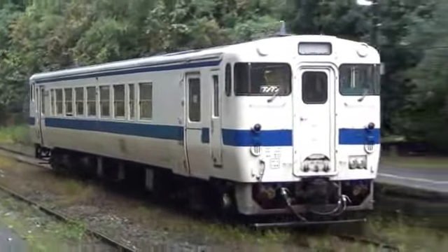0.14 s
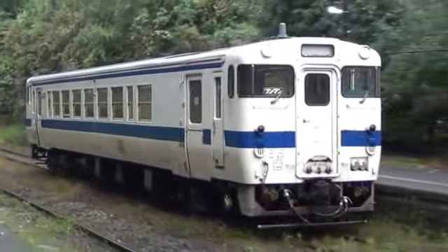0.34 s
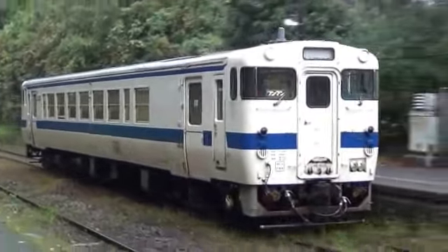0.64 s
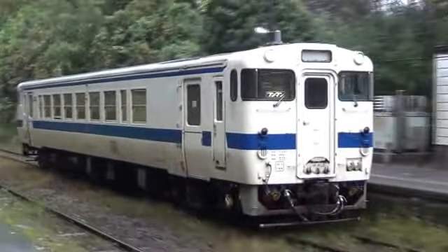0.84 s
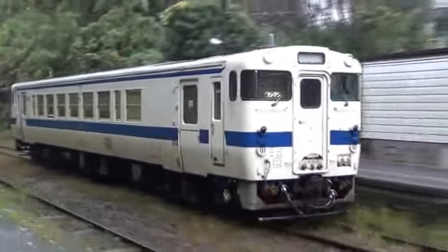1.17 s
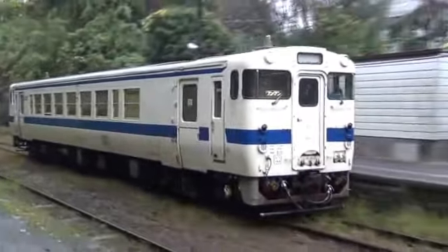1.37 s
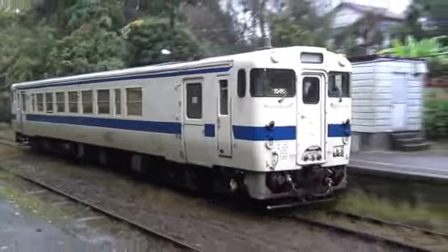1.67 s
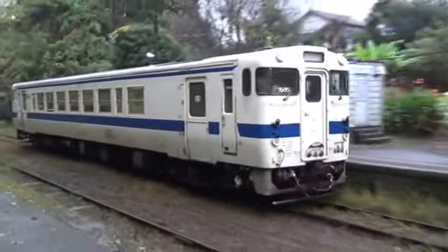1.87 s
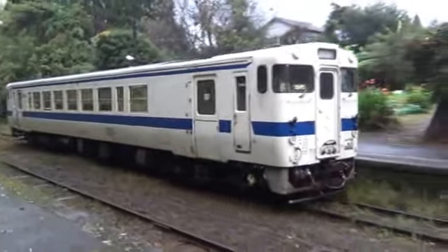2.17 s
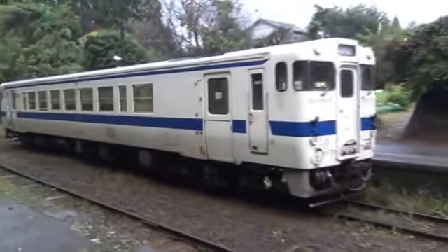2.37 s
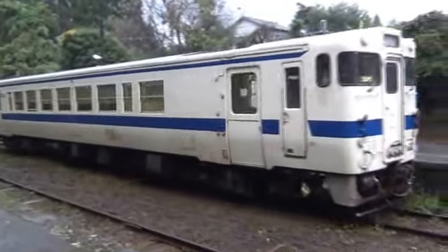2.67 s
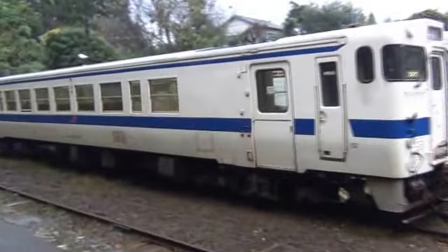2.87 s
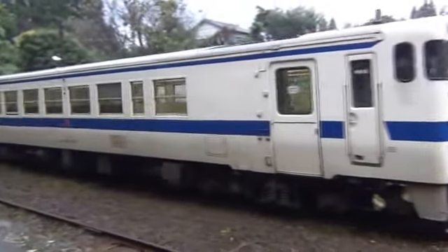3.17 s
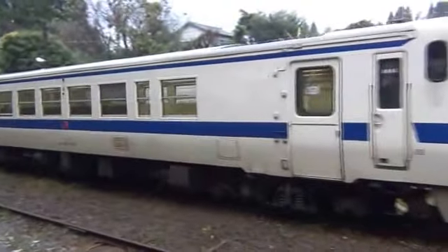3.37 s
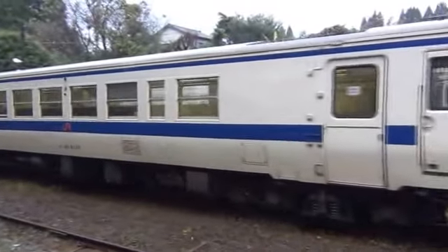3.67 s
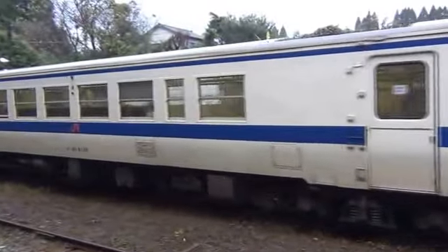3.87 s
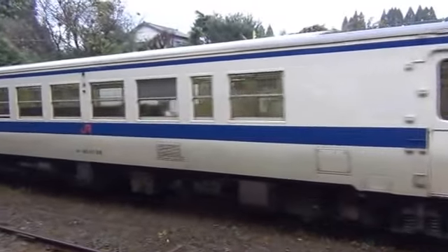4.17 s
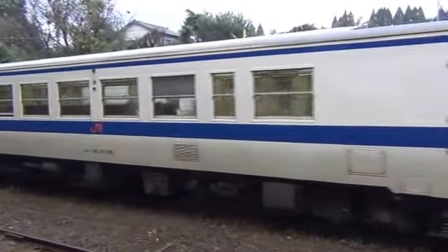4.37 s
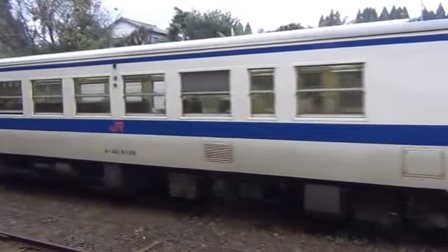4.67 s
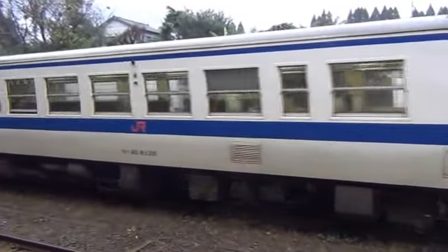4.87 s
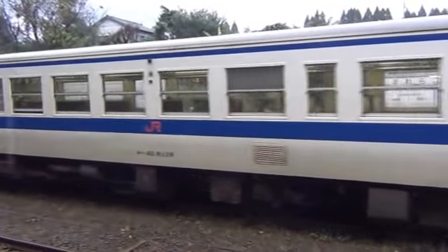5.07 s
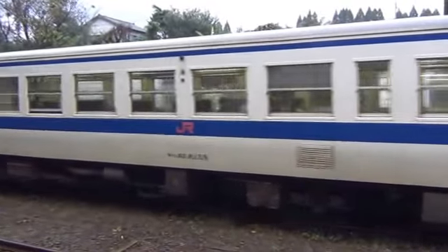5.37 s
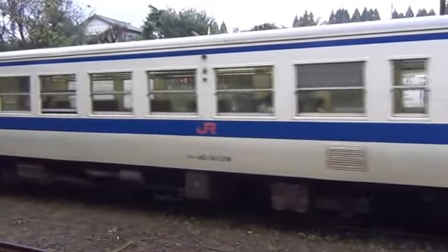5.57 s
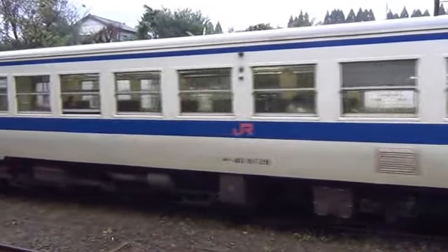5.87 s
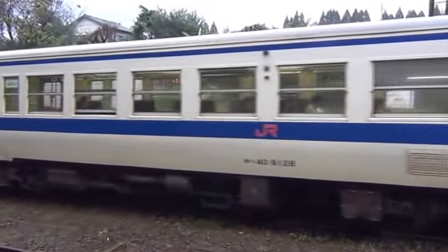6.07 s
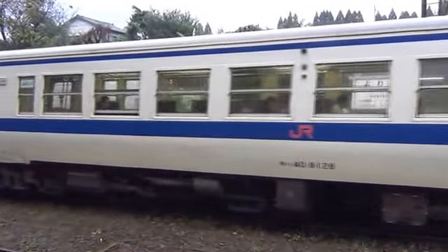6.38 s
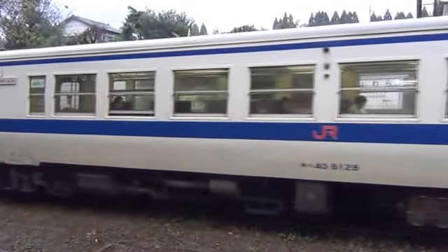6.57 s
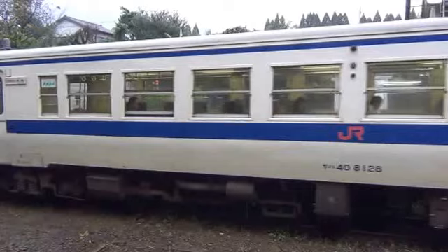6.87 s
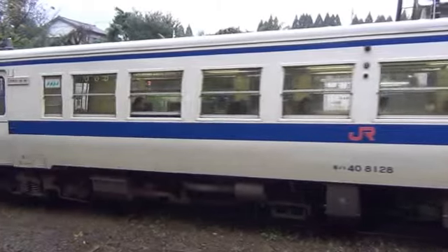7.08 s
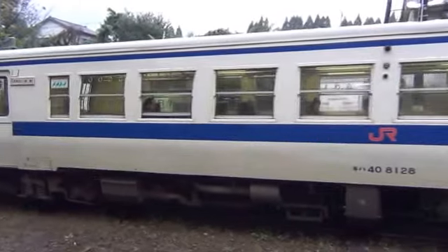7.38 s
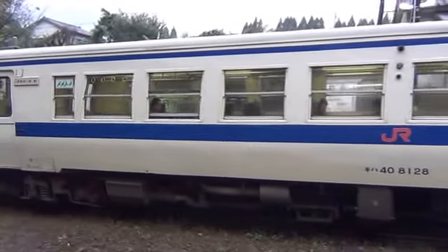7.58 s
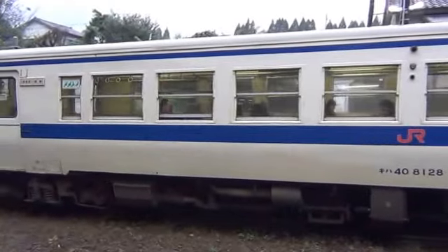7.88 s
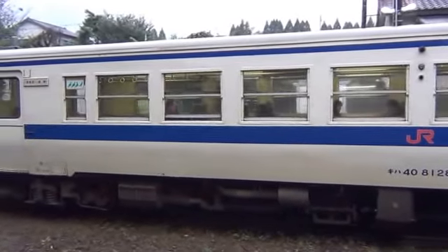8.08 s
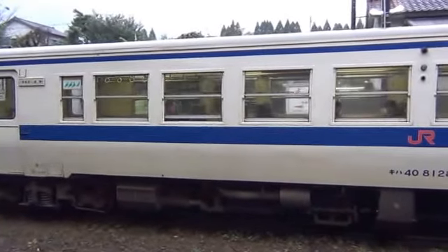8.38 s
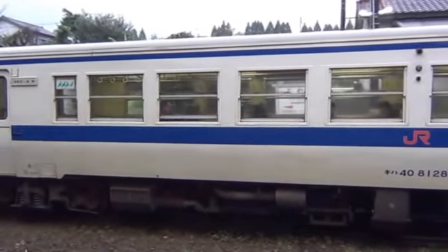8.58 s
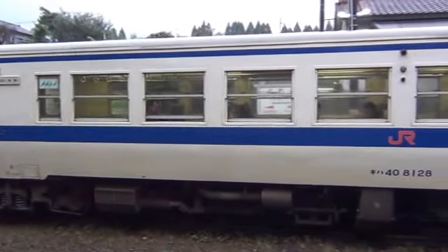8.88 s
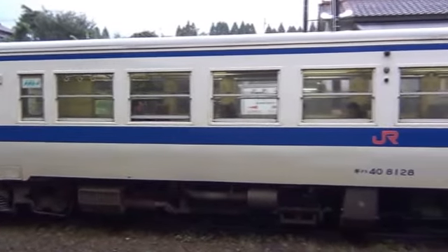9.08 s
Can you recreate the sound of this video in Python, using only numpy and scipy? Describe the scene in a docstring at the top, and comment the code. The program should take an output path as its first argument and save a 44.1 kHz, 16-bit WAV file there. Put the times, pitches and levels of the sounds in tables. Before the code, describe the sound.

A railcar slows almost to a stop very near the listener at an open-air platform. Rough steel-on-steel rolling and joint blows come first, coloured by a humming rail and sudden piercing shrieks. Then the roar drops away, and bright brake hiss with clustered, glassy squeals spreads between left and right. Finally the squeals thin to brief chirps over a soft, quick diesel knocking that grows slightly.

```python
"""Railcar braking beside the track

A diesel railcar slows almost to a stop beside a microphone pair, its engine knocking under the floor.
The engine is noise shaped by each firing, with low orders as tones; the wheels are roar and rumble noise,
with blows at the rail joints and a humming rail. The brake blocks scrape as bright noise and squeal as
narrow modes, each a tone pushed about by chance; the brakes spread and shift between left and right.
"""
import sys
import numpy as np
from scipy import signal
from scipy.io import wavfile
from scipy.ndimage import uniform_filter1d

SR = 44100
rng = np.random.default_rng(int(sys.argv[2]) if len(sys.argv) > 2 else 0)


def materialize(psi):
    """Save the field psi as 16-bit PCM at rate SR to the path in sys.argv[1].

    A 1-D psi becomes a single channel; in a 2-D psi each row is a channel.
    """
    bounded = np.clip(np.atleast_2d(psi).T, -1, 1)
    quanta = np.round(bounded * 32767).astype(np.int16)
    wavfile.write(sys.argv[1], SR, quanta)


N = 407043
T = np.arange(N) / SR

# Train speed; faster rubbing widens every squeal. Each row: time in seconds, share of the entry speed.
SPEED = [(0, 1.0), (3, 0.88), (5, 0.7), (6.5, 0.57), (7.2, .3), (8.5, 0.14), (9.23, 0.12)]

# How the microphone pair hears the wheels and the engine. Each row: frequency in Hz, likeness of the
# channels (0 to 1), left minus right in dB, left lead in radians.
WHEELS_PAIR = [(70, 0.95, 1, .25), (150, 0.93, 3.5, 0.036), (300, 1, 2, 0.36), (550, 0.98, 2, 0.68),
               (990, 0.79, 2.5, 0.037), (2500, .87, 1, 0.058), (9000, 1, 1, 0)]
ENGINE_PAIR = [(70, .99, 0, 0), (300, 1, 0, 0), (550, 0.98, 0.21, .1), (1000, 0.92, 1.2, .1),
               (2500, 0.98, 0.12, .05), (9000, 0.98, 0, 0)]
# The brakes across the pair as the car draws alongside. Each row: time in seconds, likeness of the
# channels (0 to 1), left minus right in dB, left lead in radians.
BRAKES_PAIR = [(0, 0.85, -1.5, 0), (1.3, 1, -0.5, 0), (2.5, 0.82, 0.7, 0.29), (4.5, 0.62, 1.8, 0.31),
               (6.3, 0.89, 1.2, 0.009), (8, 0.81, 1, 0.27), (9.23, 0.83, -0.5, 0.047)]
CUT_HZ, EDGE_HZ = 64, 15500  # bass roll-off of the microphone, upper band limit

# Engine loudness, before the balance of its parts. Each row: time in seconds, level in dB.
ENGINE_LEVEL = [(3.2, -23), (3.35, -36), (3.7, -39.5), (4.29, -42.5), (4.58, -38.5), (5.3, -38.5),
                (5.55, -41.5), (6.0, -44.5), (6.3, -42), (6.63, -46.5), (6.96, -47), (7.3, -43),
                (7.68, -43), (7.97, -44.5), (8.29, -40.5), (9.23, -38.5)]
# Colour of the engine block and exhaust. Each row: frequency in Hz, relative level in dB per Hz.
BLOCK_COLOUR = [(24, -58), (40, -53), (71, -42), (126, -54), (158, -26), (333, -11), (407, -39),
                (449, -14.5), (722, -9), (797, -2.5), (859, -8.5), (3560, -19.5), (4570, -26.5),
                (13300, -21), (15500, -41)]
# A broad ring of the engine casing. One row: frequency in Hz, width in Hz, lift in dB.
CASING = (1011, 48, 12)
# Humming orders of the engine. Each row: multiple of the firing rate, level in dB.
ENGINE_ORDERS = [(2, -24), (3, -31.5), (5, -25), (6, -30.5), (10, -15.5), (13, -17), (15, -18.5),
                 (24, -4.5), (29, -20)]
# Middle orders grow as the exhaust draws level. Each row: time in seconds, change in dB.
EXHAUST_NEAR = [(3.2, -5), (6, -3.5), (7.1, -1.5), (9.23, 3)]
FIRING_HZ, FIRING_AT = 34.05, 8.686  # mean firing rate, about the moment of one firing (s)

# Rolling loudness, before the roar's lift of 1.5 dB. Each row: time in seconds, level in dB.
ROLLING_LEVEL = [(0.0, -27.5), (0.15, -25.5), (0.43, -26), (0.8, -23.5), (1.3, -23), (1.71, -21),
                 (1.9, -22.5), (2.13, -20), (2.3, -24), (2.77, -26), (2.84, -22), (3.0, -21.5),
                 (3.16, -27.5), (3.29, -28), (3.47, -29), (3.55, -34.5), (4.17, -42), (4.5, -44),
                 (4.9, -40.5), (5.26, -45.5), (5.8, -43), (6.0, -57), (6.3, -57), (7.0, -63)]
# Colours of the roar and the rumble. Each row: frequency in Hz, relative level in dB per Hz.
ROAR_COLOUR = [(88, -39), (150, -13.5), (225, 0), (388, -6.5), (462, -3.5), (812, -1), (1570, -9),
               (2450, -9), (7000, -25), (9540, -25.5), (13800, -27), (15500, -105)]
RUMBLE_COLOUR = [(12, -55), (20, -25), (38, -35), (59, -17), (92, 2), (200, -7), (260, -30), (440, -120)]
RUMBLE_DB = -20.5  # at the start, relative to the rolling loudness
RUMBLE_GAIN_DB_PER_S = 0.87  # the rumble outlasts the roar as the car slows
RUMBLE_LUMPS_DB, RUMBLE_LUMPS_PER_S = 2.0, 16  # rms and rough rate of its lumps
# Brief dips of the rolling and scraping noise. Each row: middle in seconds, depth in dB, half length in seconds.
DIPS = [(1.88, -3.5, 0.058), (2.207, -7.5, 0.053), (2.79, -4, .03)]
# Wheels on rail joints. Each row: time in seconds, blow in dB before 12 dB is taken off,
# blow's fall by 60 dB in seconds, low thump in dB.
JOINTS = [(0.42, -7, 0.22, -45), (0.949, -12, 0.22, -33), (2.049, -10, 0.22, -45),
          (2.818, -3.5, 0.36, -27.5), (2.999, -20, 0.27, -46), (3.312, -7, 0.33, -37),
          (4.549, -36, 0.25, -50)]
THUMP_RISE_S, THUMP_T60 = 0.054, 0.6  # rise and fall by 60 dB (s)
# Rail modes under the rolling wheels. Each row: frequency in Hz, width in Hz at entry speed,
# level in dB relative to the hum, end in seconds.
RAIL_MODES = [(452, 14, -0.5, 3.6), (472.5, 14, -0.5, 3.6), (535.5, 16, -3, 1.8), (926, 14, -7.5, 3.0)]
# Rail hum, which comes in patches. Each row: time in seconds, level in dB.
RAIL_HUM = [(0.0, -42), (0.13, -31.5), (0.22, -40), (0.36, -28.5), (0.63, -28.5), (0.84, -41),
            (0.95, -24.5), (1.25, -34.5), (1.4, -36.5), (1.7, -29), (1.95, -38), (2.13, -34.5), (2.57, -36),
            (2.67, -47), (2.78, -34), (3.0, -34.5), (3.23, -48), (3.33, -34), (3.6, -47)]
RAIL_FLICKER_DB = 2.5  # rms
# One low hum as the last wheel crosses. One row: start in seconds, hold in seconds, frequency in Hz,
# level in dB, width in Hz at entry speed.
HOOT = (4.5, 0.18, 239, -42, 15)

# Brake block scrape, before a lift of 11.5 dB. Each row: time in seconds, level in dB.
SCRAPE_LEVEL = [(0.0, -49), (0.28, -50.5), (1.46, -43), (1.9, -39), (2.11, -41.5), (2.52, -38), (3.06, -43),
                (4.16, -50.5), (4.29, -47), (5.35, -44), (5.76, -50), (6.14, -44.5), (6.99, -46.5),
                (7.22, -59), (7.6, -50.5), (7.89, -48), (8.33, -55.5), (9.23, -64)]
# Colour of the scrape. Each row: frequency in Hz, relative level in dB.
SCRAPE_COLOUR = [(1500, -8.5), (3000, -0.5), (5000, 4.5), (6500, 0), (9000, 6), (11000, -1), (12500, -2),
                 (14000, -24), (15500, -37)]

# Stick-slip squeal catching for a moment. Each row: start in seconds, rise in seconds, hold in seconds,
# level in dB, dying in dB per second, pitch in Hz, second partial in dB relative to the first.
CATCHES = [(0.913, .035, 0.036, -22.5, 112, 4635, -2.5), (1.319, 0.092, 0.077, -22.5, 130, 4605, 0.5),
           (1.729, .05, 0.23, -21.5, 70, 4685, -1), (2.32, 0.15, 0.42, -21.5, 73, 4630, 1.5)]
CATCH_DEPTH_DB = 18  # how far down the rise begins and the fall ends
# The stick-slip squeal then holds on. Each row: time in seconds, level in dB, pitch in Hz,
# second partial in dB relative to the first.
SLIP = [(2.95, -33, 4630, -3), (3.07, -30, 4610, -26), (3.11, -24.5, 4630, -1.5), (3.37, -24.5, 4625, -1.5),
        (3.46, -33, 4590, 1.5), (3.54, -25, 4700, -3), (3.9, -30.5, 4730, -2), (4.2, -29, 4686, -5),
        (4.55, -34.5, 4616, 4.5), (4.7, -28, 4610, 1.5), (4.97, -30, 4580, -0.5), (5.08, -34.5, 4575, 0.5),
        (5.5, -29.5, 4580, 2.5), (5.64, -36, 4580, 2), (5.84, -29.5, 4580, -3), (5.951, -43, 4640, 4),
        (6.16, -39, 4620, 4), (6.22, -33, 4645, 3.5), (7.049, -41, 4785, -3), (7.2, -52, 4700, -1),
        (7.57, -56, 4780, 13), (7.64, -42, 4710, 4), (7.94, -34.5, 4670, 2), (8.05, -44, 4670, 5),
        (8.2, -39, 4620, 2), (8.3, -46, 4680, 10), (8.45, -38, 4650, -6), (8.6, -58, 4770, 0)]
SLIP_WIDTH_HZ, SLIP_FLICKER_DB = 165, 1.55  # width at entry speed, rms flicker
SLIP_HALF_DB, SLIP_THIRD_DB = -15.5, -20  # half-pitch and third partials relative to the first
SLIP_WANDER_HZ, SLIP_WANDER_PER_S = 20, 120  # fine pitch flutter: rms at entry speed, rough rate

# Strong rim modes, in close groups. Each entry: frequency in Hz.
RIM_HZ = [10460, 10630, 11390, 11545, 11690]
# Their courses, in the same order. Each row: width in Hz at entry speed, factor on the spread between
# channels, list of points (time in seconds, level in dB).
RIMS = [ (143, 1.5, [(4.22, -60), (4.38, -30), (4.72, -34), (5.25, -27), (5.33, -35), (5.5, -39),
        (5.8, -21.5), (6.05, -23), (6.24, -28), (6.45, -40), (6.55, -25), (6.9, -15.5), (7.05, -13),
        (7.1, -25), (7.22, -28), (7.3, -27), (7.5, -30.5), (7.8, -37), (8.1, -45)]),
        (122, 2.7, [(4.26, -56), (4.4, -36), (4.63, -33), (4.93, -38), (5.26, -24.5), (5.45, -26.5),
        (5.55, -24.5), (5.79, -28), (5.99, -27), (6.1, -19.5), (6.48, -23), (6.56, -31), (6.82, -32),
        (7.1, -48), (7.6, -49), (8.32, -42), (8.6, -70)]), (147.3, 3.2, [(3.3, -46), (3.55, -44),
        (3.96, -38), (4.2, -27), (4.97, -40), (5.4, -50), (6.17, -47), (6.37, -26), (6.72, -27),
        (7.2, -49)]), (128, 2.9, [(2.2, -57), (2.36, -48), (3.41, -38), (3.58, -28.5), (3.9, -23.5),
        (4.23, -33), (4.52, -33), (4.85, -38), (5.3, -35), (5.5, -31), (5.75, -33), (6.0, -40), (6.28, -39),
        (6.45, -27), (6.69, -24), (7.02, -38), (7.52, -42), (7.7, -30), (7.9, -21.5), (8.12, -20.5),
        (8.27, -36.5), (8.45, -44), (8.62, -70)]), (115.6, 1.9, [(2.2, -50), (2.39, -39), (2.88, -58),
        (3.5, -32), (3.96, -28), (4.25, -21), (4.4, -24.5), (4.79, -32.5), (5.26, -31), (5.6, -44),
        (5.75, -32), (6.05, -37), (6.28, -39), (6.36, -28), (6.66, -33), (7.1, -49)]), ]
RIM_FLICKER_DB, FLICKER_PER_S = 2.5, 18.2  # rms; rough rate shared by all flickering modes

# Shrill bursts of the highest mode. Each row: start in seconds, hold in seconds, level in dB, pitch in Hz.
SHRIEKS = [(1.217, 0.032, -17, 14600), (2.188, 0.064, -17, 14700), (2.726, .01, -22, 15000),
           (2.783, .01, -18.5, 14800), (4.69, 0.036, -33, 14600), (4.774, .06, -29, 14600),
           (5.539, 0.15, -39, 14550)]
SHRIEK_WIDTH_HZ, SHRIEK_RISE_S = 690, 0.012  # width at entry speed
SHRIEK_KNEE_DB, SHRIEK_FAST_S, SHRIEK_SLOW_S = 17.5, 0.084, 0.26  # drops fast to the knee, then lingers

# Weaker rim modes. Each entry: frequency in Hz.
WHISTLE_HZ = [1490, 2080, 3100, 4160, 4835, 5020, 5220, 5600, 5760, 5950, 6560, 7000, 7800, 8120, 8450,
              8800, 9670, 12600, 13400, 13830, 14300, 14550]
# Their widths, in the same order. Each entry: width in Hz at entry speed.
WHISTLE_WIDTHS = [108, 697, 525, 96, 103, 105, 119, 195, 89, 106, 123, 280, 103, 163, 447, 103, 177, 697,
                  190, 100, 120, 153]
# Single squeals of the rims. Each row: start in seconds, hold in seconds, pitch in Hz, level in dB.
SQUEALS = [ (0.0, 0.23, 8240, -42), (.94, 0.034, 8120, -37), (1.385, 0.059, 8300, -34),
           (1.737, 0.34, 8200, -46), (2.28, 0.22, 8200, -42), (2.37, .1, 6900, -37),
           (2.66, 0.018, 8160, -30), (3.15, 0.17, 8120, -41), (3.55, 0.61, 9560, -40),
           (3.6, 0.33, 6990, -41.5), (4.02, .8, 8120, -46), (4.098, 0.14, 7050, -37),
           (4.37, .04, 6000, -34.5), (4.462, .55, 5950, -50), (4.5, 0.98, 12700, -45), (4.6, .8, 5700, -52),
           (4.748, .15, 7000, -35.5), (5.153, 0.15, 5950, -45), (5.206, .4, 12600, -42),
           (5.35, .2, 7040, -39), (5.4, 0.25, 9670, -45), (5.553, 0.95, 5970, -48),
           (5.68, 0.73, 5660, -41.5), (5.757, .08, 7080, -41), (5.787, 0.044, 8120, -33),
           (5.799, 0.041, 8450, -37), (5.85, 0.33, 5670, -46), (5.95, .3, 4835, -38.5),
           (6.002, 1.16, 4980, -50), (6.18, 0.27, 7000, -40), (6.197, 0.59, 8360, -43),
           (6.204, .65, 12770, -40), (6.25, 0.57, 8110, -36), (6.35, 0.4, 4840, -39),
           (6.352, .08, 9600, -32), (6.417, 0.41, 5670, -38.5), (6.507, 0.024, 8120, -32),
           (6.55, 0.28, 9680, -41), (6.593, .2, 6600, -41.5), (6.625, 0.093, 5900, -38),
           (6.651, .12, 3260, -45), (6.818, .2, 3070, -46.5), (6.747, 0.14, 5740, -32.5),
           (6.902, .25, 5640, -42), (6.95, 0.33, 5740, -43), (6.963, .04, 5950, -40),
           (7.0, 0.099, 10440, -19.5), (7.004, .3, 8120, -54), (7.014, 0.068, 5966, -30.5),
           (7.135, 0.013, 10440, -18), (7.15, .2, 5950, -51), (7.211, 0.0082, 10460, -16.5),
           (7.22, .12, 10440, -25), (7.277, 0.022, 5730, -41), (7.292, 0.028, 5200, -40),
           (7.341, .015, 10460, -23.5), (7.349, .25, 5220, -46.5), (7.702, .3, 5220, -51),
           (7.35, .6, 5760, -52), (7.38, .06, 8800, -37), (7.433, 0.012, 10380, -34),
           (7.451, 1.73, 2080, -54), (7.47, 0.036, 8800, -26.5), (7.502, 0.82, 14470, -46),
           (7.498, 0.0095, 10460, -28), (7.493, 0.0077, 5760, -39), (7.562, .14, 8780, -32.5),
           (7.597, 0.019, 5760, -38), (7.6, 0.31, 9620, -35.5), (7.636, 0.0098, 10460, -24),
           (7.644, 0.011, 5220, -31), (7.642, 0.0084, 11500, -26), (7.692, 0.35, 7900, -44),
           (7.7, .25, 7000, -49), (7.714, .01, 10460, -23), (7.68, 0.0385, 4160, -38),
           (7.74, 0.023, 4160, -25), (7.75, .08, 13400, -41), (7.775, 0.0097, 11510, -20),
           (7.8, 0.31, 12700, -43), (7.8, .2, 6560, -48), (7.81, .2, 4153, -30.5), (7.821, .12, 9370, -35),
           (7.825, 0.0096, 10460, -26), (7.852, 0.088, 13830, -45), (7.88, .12, 4835, -45),
           (7.9, 0.097, 5950, -48), (7.917, .01, 11520, -19), (8.05, 0.46, 8800, -43.5),
           (8.06, .09, 4170, -38), (8.07, .4, 14250, -42), (8.121, 0.0092, 11560, -20),
           (8.15, 0.21, 1482, -42.5), (8.17, 0.041, 7800, -39), (8.2, 0.13, 4160, -50),
           (8.238, 0.24, 5950, -47), (8.26, .2, 9600, -44), (8.3, 0.0068, 8800, -37),
           (8.363, 0.072, 5940, -37), (8.4, 0.29, 13830, -44), (8.622, 0.37, 5200, -57.5),
           (8.8, .4, 13830, -49)]
SQUEAL_RISE_S, SQUEAL_FALL_S, SQUEAL_DEPTH_DB = 0.03, 0.076, 18  # shortest rise and fall, and their depth
SQUEAL_RISE_SHARE, SQUEAL_FALL_SHARE = 0.34, 0.46  # longer squeals come and go more slowly
SQUEAL_FLICKER_DB = 2.5  # rms, reached by holds of 0.7 s or more


def gain_of(db):
    """Amplitude factor of a level in dB."""
    return 10 ** (np.asarray(db) / 20)


def evened(x):
    """Signal scaled to rms 1."""
    return x / np.sqrt(np.mean(x ** 2) + 1e-20)


def curve(points, t):
    """Straight lines between points in time."""
    return np.interp(t, *np.transpose(points))


def read(points, hz):
    """Straight lines between points on a logarithmic frequency scale."""
    f, value = np.transpose(points)
    return np.interp(np.log(hz + 1), np.log(f + 1), value)


def slow(length, per_s):
    """Smooth chance of rms 1, about per_s changes a second."""
    span = max(int(SR / per_s), 1)
    smooth = uniform_filter1d(rng.standard_normal(length), span)
    return evened(uniform_filter1d(smooth, span))


def wobble(clock):
    """Complex chance for both channels, one new value at each whole step of the clock."""
    knots = rng.standard_normal((int(clock[-1]) + 2, 4)).T
    a, b, c, d = (np.interp(clock, np.arange(len(k)), k) for k in knots)
    return np.array([a + 1j * b, c + 1j * d])


def heard(main, other, same, lean_db, lead):
    """Left and right from a complex signal and an unrelated one."""
    same = np.clip(same, 0, 1)
    lean = gain_of(lean_db / 2) * np.exp(0.5j * lead)
    right = same * main + np.sqrt(1 - same ** 2) * other
    return np.array([main * lean, right / lean])


def brakes_pair(t):
    """Likeness, lean and lead of the brakes at the microphone pair over time."""
    s, *columns = np.transpose(BRAKES_PAIR)
    return [np.interp(t, s, c) for c in columns]


def noise(colour, patchy_db, pair=None):
    """Two channels of noise with a spectrum and drifting patches; without a pair table it sits at the brakes."""
    frames, hz = N // 256 + 5, np.fft.rfftfreq(1024, 1 / SR)
    a, b, c, d, patches = rng.standard_normal((frames, 513, 5), dtype=np.float32).T
    patches = uniform_filter1d(patches, size=12, axis=0)
    patches = evened(uniform_filter1d(patches, size=10, axis=1))
    if pair is None:
        place = brakes_pair(np.arange(frames) * 256 / SR)
    else:
        f, *columns = np.transpose(pair)
        place = [read(np.transpose([f, column]), hz)[:, None] for column in columns]
    spectra = heard(a + 1j * b, c + 1j * d, *place)
    spectra = spectra * gain_of(colour(hz)[:, None] + patchy_db * patches)
    return evened(signal.istft(spectra, nperseg=1024, noverlap=768)[1][:, :N])


def wavering(s, db, flicker_db):
    """A level curve on a fine time grid, with the grip flickering around it."""
    fine = np.arange(s[0], s[-1], 0.005)
    chance = slow(N, FLICKER_PER_S)[np.minimum((fine * SR).astype(int), N - 1)]
    return fine, np.interp(fine, s, db) + flicker_db * chance


def swell(start, hold, db, rise, fall, depth_db):
    """Times and levels of a rise, hold and fall."""
    s = np.array([max(start - rise, 0), start + 1e-4, start + hold, start + hold + fall])
    return s, db - depth_db * np.array([1, 0, 0, 1])


def struck(db, at, rise, t60):
    """Size over time of something struck at one moment."""
    falling_db = db - 60 * (T - at) / t60 * (T > at)
    return gain_of(falling_db) * np.clip((T - at) / rise, 0, 1)


def dips_db():
    """Brief dips in the level of the noise."""
    return sum(depth * np.clip(1 - abs(T - at) / half, 0, 1) for at, depth, half in DIPS)


def add(mix, s, db, hz, width, spread=1.0, lean_db=0.0, steady=0.21, grit_db=-6.5, grit_spread=3.5):
    """Adds one mode: a tone pushed about in size and phase by rubbing, with a gritty skirt; steadier when slow."""
    t = np.arange(s[0], min(s[-1], N / SR - 0.001), 1 / SR)
    db, hz = (np.interp(t, s, c * np.ones(len(s))) for c in (db, hz))
    speed = np.clip(curve(SPEED, t), 0.05, 1.5)
    clock = np.cumsum(width * speed) / SR  # chance runs faster in a wide mode
    push = wobble(clock)
    grit = wobble(grit_spread * clock + 110 * (t - t[0]))
    near, other = push + gain_of(grit_db) * grit
    near = near + steady / speed
    near, other = (z * (abs(z) + 0.9) ** -0.3 for z in (near, other))  # friction limits the swing
    same, lean, lead = brakes_pair(t)
    pushed = heard(near, other, 1 - spread * (1 - same), lean + lean_db, lead)
    tone = (pushed * np.exp(2j * np.pi * np.cumsum(hz) / SR)).real
    ends = signal.windows.tukey(len(t), min(0.06 * SR / len(t), 1))
    mix[:, round(s[0] * SR):][:, :len(t)] += evened(tone) * gain_of(db) * ends


def block_noise(side):
    """Noise of the block and casing, kept below 4500 Hz by a positive side and above it by a negative one."""
    ring_hz, width, ring_db = CASING

    def colour(hz):
        ring = ring_db / (1 + (2 * (hz - ring_hz) / width) ** 2)
        return read(BLOCK_COLOUR, hz) + ring - 10 * np.log10(1 + (hz / 4500) ** side)
    return noise(colour, patchy_db=1.5, pair=ENGINE_PAIR)


def engine_hum(turns):
    """Low orders of the firing rate as wavering tones, the middle ones growing with the exhaust."""
    near_db = curve(EXHAUST_NEAR, T)
    hum = 0
    for k, db in ENGINE_ORDERS:
        level_db = db + 1.6 * slow(N, 9.0) + (4 < k < 20) * near_db
        hum = hum + np.sqrt(2) * gain_of(level_db) * np.sin(2 * np.pi * (k * turns + rng.random()))
    return hum


def engine():
    """Each firing sends a knock of noise through the block, sharpest in the treble; low orders hum as tones."""
    turns = FIRING_HZ * (T - FIRING_AT) + 0.012 * slow(N, 3)  # counted in firings
    turns -= np.floor(turns.min())
    strength = gain_of(2.1 * rng.standard_normal(int(turns.max()) + 1))[turns.astype(int)]
    phase = turns % 1
    body, treble = block_noise(4), block_noise(-4)
    knock = evened(1.5 + strength * np.exp(-phase / 0.48) * np.clip(phase / 0.051, 0, 1))
    tick = evened(0.092 + strength * np.exp(-phase / 0.31) * np.clip(phase / 0.037, 0, 1))
    size = gain_of(curve(ENGINE_LEVEL, T)) * np.clip((T - ENGINE_LEVEL[0][0]) / 0.49, 0, 1)
    return size * (gain_of(3.0) * body * knock + gain_of(-4.5) * treble * tick + engine_hum(turns))


def roar_and_rumble():
    """Rough steel on steel: a wide roar and a lumpy low rumble, with a thump at each joint."""
    level_db = curve(ROLLING_LEVEL, T) + dips_db()
    roar = noise(lambda hz: read(ROAR_COLOUR, hz), patchy_db=1.5, pair=WHEELS_PAIR)
    lumps_db = RUMBLE_DB + RUMBLE_GAIN_DB_PER_S * T + RUMBLE_LUMPS_DB * slow(N, RUMBLE_LUMPS_PER_S)
    thumps = sum(struck(db, at, THUMP_RISE_S, THUMP_T60) for at, *_, db in JOINTS)
    rumble = noise(lambda hz: read(RUMBLE_COLOUR, hz), patchy_db=-0.5, pair=WHEELS_PAIR)
    rumble = rumble * (gain_of(level_db + lumps_db) + thumps)
    fade = np.clip((ROLLING_LEVEL[-1][0] - T) / 0.78, 0, 1)
    return (roar * gain_of(level_db + 1.5) + rumble) * fade


def joint_blows():
    """Wheels striking rail joints: roar noise with less treble, rising at once and dying away."""
    def colour(hz):
        return read(ROAR_COLOUR, hz) - 5.7 * np.log2(1 + hz / 900)
    blows = sum(struck(db - 12.0, at, 0.0018, t60) for at, db, t60, *_ in JOINTS)
    return noise(colour, patchy_db=-0.5, pair=WHEELS_PAIR) * blows


def rail_hum():
    """Narrow rail modes humming in patches, and one lower hum as the last wheel crosses."""
    out = np.zeros((2, N))
    for hz, width, db, last in RAIL_MODES:
        t = T[T < last]
        course = wavering(t, db + curve(RAIL_HUM, t), RAIL_FLICKER_DB)
        add(out, *course, hz, width, steady=0.22, grit_db=-14)
    start, hold, hz, db, width = HOOT
    shape = swell(start, hold, db, rise=0.06, fall=0.052, depth_db=23)
    add(out, *shape, hz, width, steady=0.22, grit_db=-18)
    return out


def rolling():
    """Wheels on the rails: roar, rumble, joint blows and the humming rail."""
    return roar_and_rumble() + joint_blows() + rail_hum()


def scrape():
    """Brake blocks rubbing: bright hiss that flickers with the grip."""
    grip_db = curve(SCRAPE_LEVEL, T) + dips_db() + 1.66 * slow(N, 65)
    return noise(lambda hz: read(SCRAPE_COLOUR, hz), patchy_db=2.5) * gain_of(grip_db + 11.5)


def slip(mix, s, db, hz, second_db):
    """Adds the stick-slip mode, with partials at half, twice and three times its pitch."""
    fine = np.arange(s[0], s[-1], 0.002)
    db, hz, second_db = (np.interp(fine, s, c * np.ones(len(s))) for c in (db, hz, second_db))
    flutter = slow(N, SLIP_WANDER_PER_S)[(fine * SR).astype(int)]
    hz = hz + SLIP_WANDER_HZ * curve(SPEED, fine) * flutter  # less as the car slows
    add(mix, fine, db, hz, SLIP_WIDTH_HZ, spread=1.0, lean_db=2.5)
    add(mix, fine, db + second_db, 2 * hz, 1.5 * SLIP_WIDTH_HZ, spread=0.98, lean_db=-0.5)
    add(mix, fine, db + SLIP_THIRD_DB, 3 * hz, 2.6 * SLIP_WIDTH_HZ)
    add(mix, fine, db + SLIP_HALF_DB, hz / 2, 1.7 * SLIP_WIDTH_HZ)


def stick_slip(mix):
    """Blocks sticking and slipping on the rims: short catches, then a squeal that holds on."""
    for start, rise, hold, db, dying, hz, second_db in CATCHES:
        shape = swell(start, hold, db, rise, CATCH_DEPTH_DB / dying, CATCH_DEPTH_DB)
        slip(mix, *shape, hz, second_db)
    s, db, hz, second_db = np.transpose(SLIP)
    fine, level_db = wavering(s, db, SLIP_FLICKER_DB)
    slip(mix, fine, level_db, np.interp(fine, s, hz), np.interp(fine, s, second_db))


def strong_rims(mix):
    """Strong rim modes, each following its own flickering level curve."""
    for hz, (width, spread, rows) in zip(RIM_HZ, RIMS):
        add(mix, *wavering(*np.transpose(rows), RIM_FLICKER_DB), hz, width, spread, lean_db=-1.1)


def shrieks(mix):
    """Shrill bursts of the highest mode, dropping fast and then lingering."""
    for start, hold, db, hz in SHRIEKS:
        s, level_db = swell(start, hold, db, SHRIEK_RISE_S, SHRIEK_FAST_S, SHRIEK_KNEE_DB)
        s = np.r_[s[0] - 0.03, s, s[-1] + SHRIEK_SLOW_S]
        level_db = np.r_[db - 30, level_db, db - 2.2 * SHRIEK_KNEE_DB]
        add(mix, s, level_db, hz, SHRIEK_WIDTH_HZ, spread=0.4, lean_db=-0.6)


def single_squeals(mix):
    """Rim modes that sound up, hold and die, each with the width and spread of the nearest listed mode."""
    modes = [(hz, width, spread, -1.3) for hz, (width, spread, _) in zip(RIM_HZ, RIMS)]
    modes += [(hz, width, 1, 0) for hz, width in zip(WHISTLE_HZ, WHISTLE_WIDTHS)]
    for start, hold, hz, db in SQUEALS:
        _, width, spread, lean_db = min(modes, key=lambda mode: abs(mode[0] - hz))
        rise = SQUEAL_RISE_S + SQUEAL_RISE_SHARE * hold
        fall = SQUEAL_FALL_S + SQUEAL_FALL_SHARE * hold
        shape = swell(start, hold, db, rise, fall, SQUEAL_DEPTH_DB)
        course = wavering(*shape, SQUEAL_FLICKER_DB * min(hold / 0.7, 1))
        add(mix, *course, hz, width, spread, lean_db)


def squeal():
    """All squealing modes of the wheel rims, driven by the rubbing blocks."""
    out = np.zeros((2, N))
    stick_slip(out)
    strong_rims(out)
    shrieks(out)
    single_squeals(out)
    return out


def scene():
    """The engine behind the rolling wheels, with the brakes on top."""
    return engine() + rolling() + scrape() + squeal()


def record(dry):
    """Bass roll-off of the microphone, then the band limit."""
    roll_off = signal.butter(2, CUT_HZ, "high", fs=SR, output="sos")
    thin = signal.sosfilt(roll_off, dry)
    band_limit = signal.firwin(511, EDGE_HZ, window=("kaiser", 9), fs=SR)
    return signal.oaconvolve(thin, band_limit[None], "same")


dry = scene()
out = record(dry)
materialize(out)
```